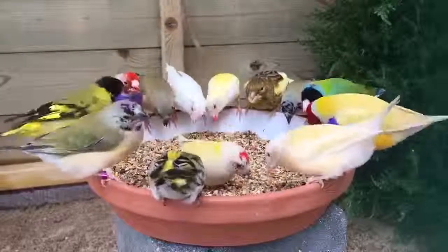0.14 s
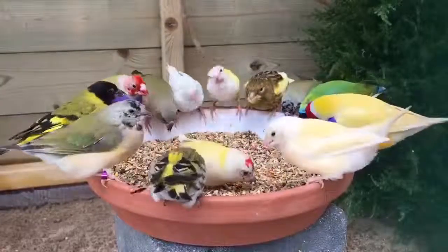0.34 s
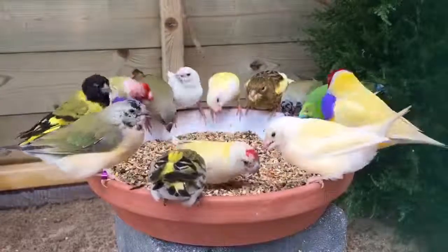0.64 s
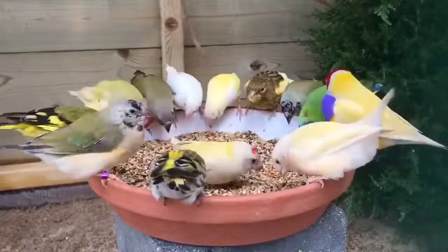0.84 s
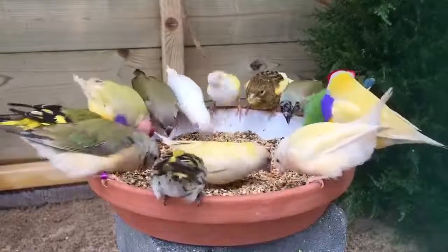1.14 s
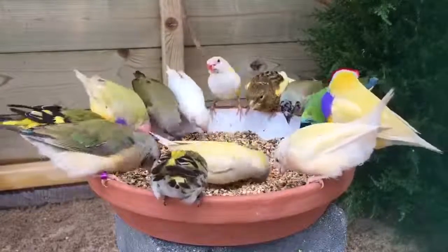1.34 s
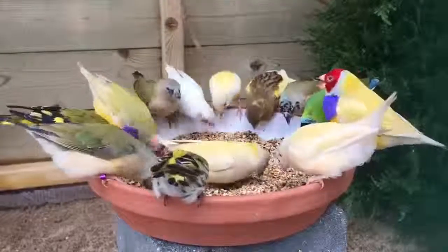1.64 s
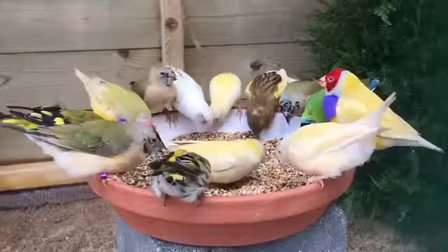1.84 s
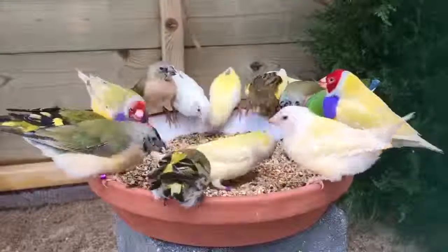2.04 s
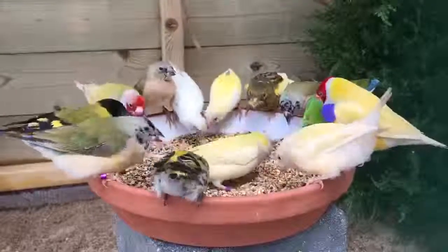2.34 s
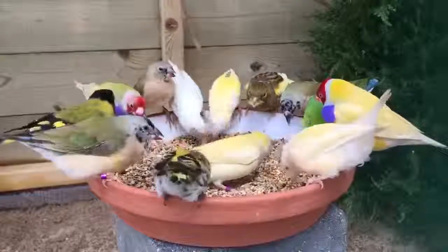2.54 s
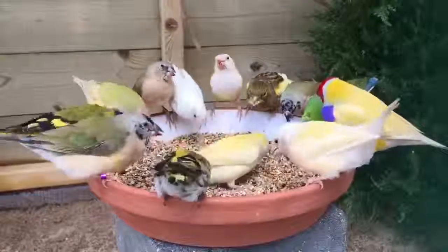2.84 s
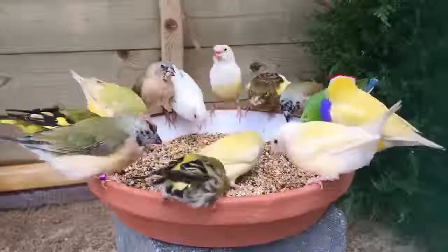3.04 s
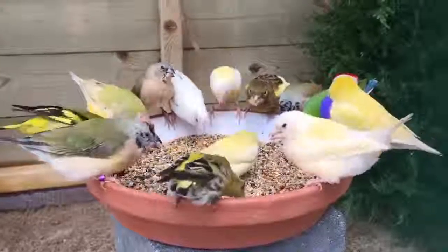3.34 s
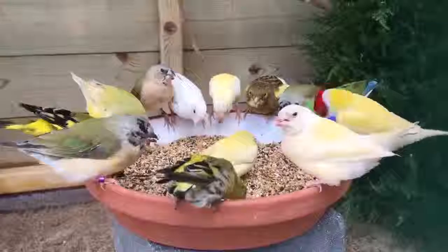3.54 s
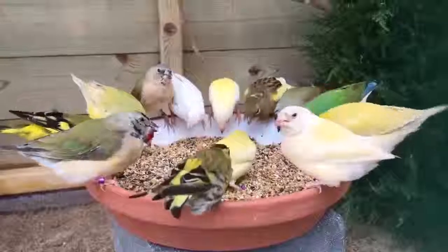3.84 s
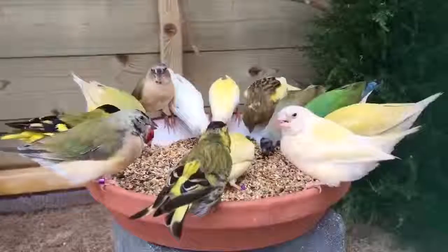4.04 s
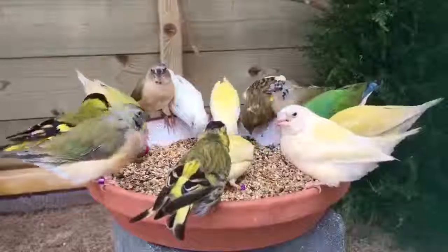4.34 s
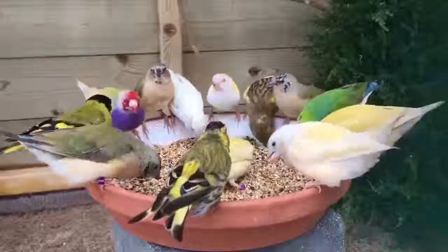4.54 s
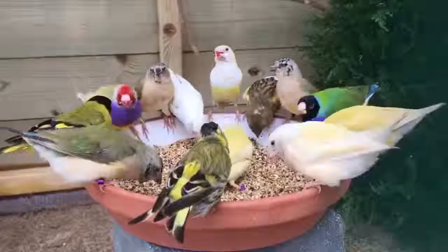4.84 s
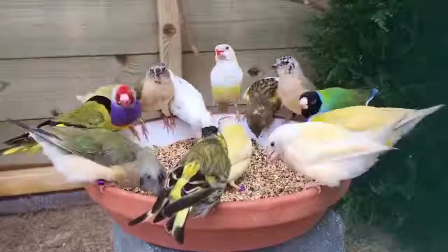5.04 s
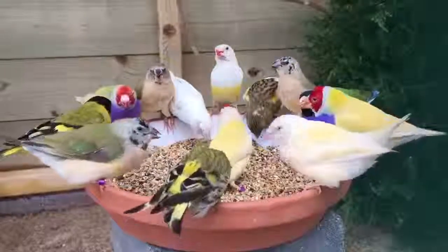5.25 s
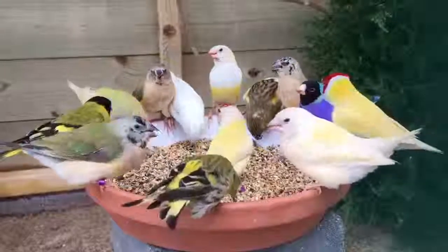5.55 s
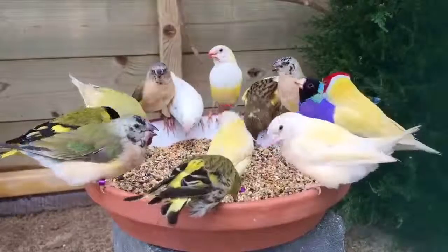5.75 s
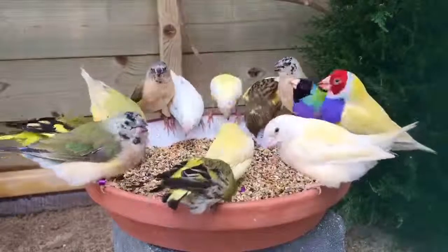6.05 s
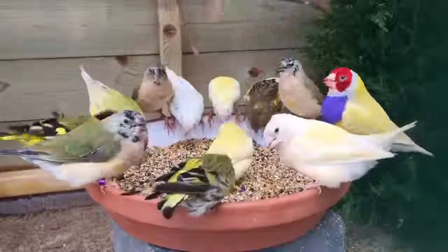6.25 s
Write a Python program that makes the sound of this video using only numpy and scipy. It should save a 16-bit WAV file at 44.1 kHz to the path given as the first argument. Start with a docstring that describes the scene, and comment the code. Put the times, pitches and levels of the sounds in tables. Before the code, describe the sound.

Finches crack seed at a clay dish with dry beak ticks and thin chirps, two loud wooden knocks, then distant squeaks over faint hiss.

```python
"""In a wooden aviary, finches husk seed at a clay dish close to the microphone.
Near sounds are bursts and grains of noise through resonances: beak ticks, scuffs, drags, rustling seed.
Thin chirps are arched whistles; two hard knocks and softer thuds ring wood modes and rattling boards.
Late on, farther off, something squeaks: high scraping of tone and noise, before and among squeaks with
clear partials around 1 kHz and lower. Hiss and an uneven low rumble, both shaped noise, lie under it all."""
import sys
import numpy as np
from scipy import signal
from scipy.fft import rfft, irfft
from scipy.io import wavfile
from scipy.ndimage import uniform_filter1d

SR = 44100
rng = np.random.default_rng(int(sys.argv[2]) if len(sys.argv) > 2 else 0)


def to_wav(sig):
    """Store sig (one row per channel, or 1-D mono) as 16-bit WAV at the path in sys.argv[1].

    Samples outside -1..1 are clipped; the rate is SR.
    """
    pcm = np.clip(np.atleast_2d(sig), -1, 1) * 32767
    pcm = np.round(pcm).astype(np.int16)
    wavfile.write(sys.argv[1], SR, pcm.T)  # frames by channels


def decibels_to_gain(level_db):
    """Convert a level in decibels to a linear amplitude gain (20 dB per decade)."""
    exponent = np.asarray(level_db, float) / 20
    return 10 ** exponent


N = 281799  # length in samples


def evened(x):
    """Scales to rms 1."""
    return x / np.sqrt(np.mean(x ** 2) + 1e-20)


def read(points, hz):
    """Reads a spectrum on a log frequency axis."""
    f, value = np.transpose(points)
    return np.interp(np.log(hz + 1), np.log(f + 1), value)


def add(mix, s, sound):
    """Mixes a sound in at time s."""
    part = mix[round(s * SR):][:len(sound)]
    part += sound[:len(part)]


def coloured(x, points):
    """Filters x by a spectrum in dB."""
    hz = np.fft.rfftfreq(len(x), 1 / SR)
    return irfft(rfft(x) * decibels_to_gain(read(points, hz)), len(x))


def resonate(x, hz, width):
    """Shifts the pitch or curve hz down to zero, smooths twice and shifts back: a steep resonance."""
    turn = np.exp(2j * np.pi * np.cumsum(hz * np.ones(len(x))) / SR)
    r = np.exp(-np.pi * width / SR)
    smooth = signal.lfilter([(1 - r) ** 2], [1, -2 * r, r * r], x / turn)
    return 2 * (turn * smooth).real


def wobble(n, size):
    """Slow chance of rms 1, smoothed twice over size samples."""
    return evened(uniform_filter1d(uniform_filter1d(rng.standard_normal(n), size), size))


def columns(rows):
    """Curve rows at sample rate: start, soft edges and a list of curves."""
    s, *rest = np.transpose(rows)
    t = np.arange(s[0], s[-1], 1 / SR)
    edge = np.clip(np.minimum(t - s[0], s[-1] - t) / 0.00087, 0, 1)
    return s[0], edge, [np.interp(t, s, c) for c in rest]


def hiss():
    """Steady background hiss; the level flickers in small random patches of time and frequency."""
    # Tone of the hiss. Each row: frequency in Hz, relative level in dB per Hz.
    hiss_tone = [(88, -20.5), (150, 4), (520, -10.5), (1050, -11), (2760, -15), (4000, -15.5),
                 (4950, -18.5), (7880, -19.5), (8860, -25), (14400, -46), (15600, -49)]
    hz, _, z = signal.stft(rng.standard_normal(N), SR, nperseg=1024)
    patches = uniform_filter1d(rng.standard_normal(z.shape), size=3, axis=0)
    patches = evened(uniform_filter1d(patches, size=2, axis=1))
    z = z * decibels_to_gain(read(hiss_tone, hz)[:, None] + 2.3 * patches)
    return decibels_to_gain(-69) * evened(signal.istft(z, SR, nperseg=1024)[1][:N])


def rumble():
    """Low noise in lumps: a resonance with a moving centre over a broad part."""
    # Course of the rumble. Each row: time in seconds, level in dB, centre in Hz.
    rumble_course = [(0.0, -65.5, 78), (1.12, -72.5, 71), (1.278, -65, 85.6), (2.81, -65.5, 117),
                     (3.02, -69, 70.5), (3.452, -59.5, 71), (3.9, -70, 102), (4.22, -70, 68),
                     (4.96, -62, 90.4), (5.44, -60.5, 86.4), (5.68, -64, 62.4), (6.39, -57, 49.5)]
    # Broad part under the moving centre. Each row: frequency in Hz, relative level in dB per Hz.
    broad_tone = [(20, -37), (45, -2.5), (130, -23), (450, -35.5), (1000, -62)]
    s, db, centre_hz = np.transpose(rumble_course)
    t = np.arange(N) / SR
    hum = evened(resonate(rng.standard_normal(N), np.interp(t, s, centre_hz), 34.5))
    broad = evened(coloured(rng.standard_normal(N), broad_tone))
    lumps = decibels_to_gain(np.interp(t, s, db) + 4.88 * wobble(N, size=1500))
    return lumps * (1.17 * hum + 0.46 * broad)


def rustle():
    """Dry seed shifts in the dish: tiny grains of noise in short swells over a faint stirring bed."""
    # Swells of the seed. Each row: centre in seconds, level in dB, length in seconds.
    swells = [(.0, -70, 0.048), (.1, -66, 0.048), (.42, -64.5, 0.066), (.49, -75, 0.12),
              (.58, -72.5, 0.051), (.87, -76, 0.045), (1.0, -66.5, 0.046), (1.09, -78.5, 0.22),
              (1.585, -60, 0.051), (2.1, -66, 0.072), (2.28, -73, 0.091), (2.37, -72.5, 0.056),
              (2.64, -80, .06), (2.88, -72.5, 0.056), (3.02, -77, 0.11), (3.715, -68, 0.028),
              (3.79, -86, 0.033), (4.5, -76, .05), (4.65, -80, 0.043), (4.97, -68, 0.13),
              (5.87, -64, 0.034), (6.145, -66.5, 0.046), (6.35, -65, 0.27)]
    # Tone of the seed. Each row: frequency in Hz, relative level in dB per Hz.
    seed_tone = [(5000, -6.5), (9000, -5), (11500, -1.5), (14500, 1.5), (15600, -6.5)]
    t = np.arange(N) / SR
    gain = decibels_to_gain(-82.5 + 3 * wobble(N, size=2000))  # the bed
    for s, db, length in swells:
        gain = gain + decibels_to_gain(db) * np.cos(np.pi * np.clip((t - s) / length, -.5, .5))
    grains = rng.standard_normal(N) * decibels_to_gain(1.9 * wobble(N, size=60))
    return gain * evened(coloured(grains, seed_tone))


def chirps():
    """Near-pure whistles with a slight flutter: pitch and level rise to one top, then both sink."""
    # Short calls of the finches. Each row: start in seconds, length in seconds, rms level at the top
    # in dB, top pitch in Hz, depth of the pitch arch in Hz.
    calls = [(0.084, 0.053, -63, 4450, 1090), (0.859, 0.043, -59, 4370, 1300),
             (1.258, 0.04, -59.5, 4364, 1310), (1.838, .045, -77, 4360, 600),
             (2.689, 0.068, -74, 4050, 800), (3.617, .045, -73, 5200, 200),
             (3.629, 0.031, -67.5, 4350, 300), (4.405, 0.059, -80, 4200, 400),
             (4.677, 0.031, -68.5, 4430, 503), (4.841, 0.014, -62.5, 5650, 300),
             (4.872, .07, -71, 3840, 298), (5.382, 0.048, -61, 4270, 396), (5.72, 0.072, -69.5, 4140, 705),
             (6.292, 0.11, -58.5, 4290, 405)]
    top_at = .36  # share of the call at which pitch and level top
    out = np.zeros(N)
    for s, length, db, top_hz, arch_hz in calls:
        u = np.arange(0, length, 1 / SR) / length - top_at
        hz = top_hz - arch_hz * u ** 2
        swell_db = -10 * (u / top_at) ** 2
        fade_db = -15 * (u / (1 - top_at)) ** 2
        shape_db = np.where(u < 0, swell_db, fade_db)
        pitch_flutter = wobble(SR // 4, size=80)[:len(u)]
        level_flutter = wobble(SR // 4, size=80)[:len(u)]
        turns = np.cumsum(hz * (1 + 0.0011 * pitch_flutter)) / SR
        whistle = decibels_to_gain(db + shape_db + 1.2 * level_flutter) * np.sin(2 * np.pi * turns)
        add(out, s, np.sqrt(2) * signal.windows.tukey(len(u), .15) * whistle)
    return out


def room(x, t60):
    """Sparse reflections of random sign off the wooden walls, dying by 60 dB in t60 seconds."""
    t = np.arange(SR // 3) / SR
    sparse = rng.choice([-1., 1.], len(t)) * (rng.random(len(t)) < .05)
    taps = sparse * decibels_to_gain(-60 * t / t60) * (t > .003)
    return signal.fftconvolve(x, taps / np.linalg.norm(taps))[:N]


def ticks():
    """Beak ticks: a sharp crack with a brief ring, in a short burst of noise that swells and dies around it."""
    # Beak ticks on seed. Each row: crack in seconds, level in dB, ring in Hz.
    tick_rows = [(0.0978, -41.5, 4360), (0.24, -42, 2820), (0.402, -51, 4000), (0.4244, -50.5, 4320),
                 (0.5752, -44, 2420), (0.906, -55, 4650), (1.002, -42, 3800), (1.023, -49.5, 2830),
                 (1.2987, -52, 5100), (1.582, -46.5, 5640), (2.145, -46.5, 3940), (2.2593, -51.5, 3670),
                 (2.3745, -57, 4300), (3.0037, -52, 3380), (3.3773, -54.5, 4200), (3.7108, -41, 6900),
                 (3.7123, -43.5, 2430), (3.7662, -45, 2530), (3.7828, -37, 3200), (3.7913, -46, 2200),
                 (3.8224, -43, 2650), (4.0614, -50.5, 5900), (4.235, -42.5, 3130), (4.577, -52.5, 4100),
                 (5.343, -50, 2760), (5.8648, -42.5, 4160), (6.0724, -44.5, 2270), (6.1367, -44.5, 3130)]
    out, t = np.zeros(N), np.arange(-440, 900) / SR
    before, after = np.minimum(t, 0), np.maximum(t, 0)
    for s, db, hz in tick_rows:
        crack = rng.standard_normal(len(t)) * (t >= 0) * decibels_to_gain(-60 * after / .003)
        burst = rng.standard_normal(len(t)) * decibels_to_gain(-20.5 - 60 * after / 0.11 + 60 * before / 0.044)
        ring = np.sin(2 * np.pi * hz * after) * decibels_to_gain(-60 * after / 0.015)
        body = 0.28 * ring + 1.62 * resonate(crack + burst, hz, 4750)
        top = decibels_to_gain(-33.0) * resonate(crack + burst, 12000, 5900)
        add(out, s + t[0], decibels_to_gain(db) * (body + top))
    return out


def scuffs():
    """Scuffs, and one soft low thud: clumped grains of noise through one resonance, narrow or broad."""
    # Scuffs of feet and seed, and the thud at 133 Hz. Each row: start in seconds, level in dB,
    # length in seconds (0.1 at most is heard), centre in Hz, width in Hz.
    scuff_rows = [(0.52, -72, 0.049, 7140, 2500), (0.574, -71, 0.055, 2220, 900),
                  (1.063, -66.5, 0.041, 6500, 2500), (2.08, -61, 0.049, 2180, 2580),
                  (3.793, -56.5, 0.03, 1240, 1760), (4.943, -60.5, 0.056, 5160, 6150),
                  (5.15, -69, 0.075, 5770, 3120), (5.189, -62, 0.045, 1340, 300),
                  (5.83, -70, 0.12, 5000, 5040), (5.271, -49.5, 0.057, 133.3, 46.7),
                  (5.579, -63.5, 0.055, 5150, 5850), (6.3, -55, 0.072, 1510, 2840)]
    out = np.zeros(N)
    for s, db, length, hz, width in scuff_rows:
        n = min(round(length * SR), 4410)
        grains = rng.standard_normal(n) * decibels_to_gain(1.2 * wobble(4410, size=50)[:n])
        scuff = evened(resonate(grains, hz, width))
        add(out, s, decibels_to_gain(db) * scuff * signal.windows.tukey(n, .6))
    return out


def drags():
    """A foot drags across the dish: clumped grains through its resonances, the low ones coming last."""
    # Drags. Each row: start at 3500 Hz in seconds, level in dB, length in seconds,
    # lag of the lower resonances in seconds per octave.
    drag_rows = [(1.07, -64, 0.081, 0.01), (5.262, -56, 0.071, 0.0014)]
    # Resonances of the clay dish. Each row: frequency in Hz, width in Hz, relative level in dB.
    dish_parts = [(850, 120, -9), (1154, 190, -0.5), (1655, 120, 0), (2420, 670, -2), (3480, 560, -6.5)]
    out = np.zeros(N)
    for s, db, length, lag in drag_rows:
        n = round(length * SR)
        swell = np.sin(np.pi * (np.arange(n) / n) ** 0.59)
        for hz, width, part_db in dish_parts:
            grains = rng.standard_normal(n) * decibels_to_gain(5.5 * wobble(4410, size=120)[:n])
            friction = evened(resonate(grains, hz, width))
            add(out, s + lag * np.log2(3500 / hz), decibels_to_gain(db + part_db) * friction * swell)
    return out


def knocks():
    """Each blow rings the wood modes, the low ones swelling slowly; boards rattle, the bass lasting longest."""
    # Blows on the woodwork. Each row: start in seconds, level in dB, hardness in dB (treble of the blow),
    # bass in dB, ringing time as a factor.
    blows = [(2.1146, -34.5, -16, 2, 0.14), (2.797, -48.5, -13.5, 3, 0.33), (3.155, -26, -10.5, -4, 0.91),
             (3.172, -27.5, -23, -5, 0.7), (3.308, -43.5, -19, 0.5, 1), (3.566, -59.5, -4, 33, 0.16),
             (3.805, -55, 1.5, 15, 0.49), (4.121, -24, -6.5, -4, 0.81), (4.14, -26.5, -20, 3, 0.32),
             (4.234, -41, -19, -22, 0.25), (4.284, -36.5, -26.5, 4, 0.75), (4.804, -64.5, -18, 21, 0.2),
             (4.91, -60.5, -8, 7.5, 1), (5.827, -38.5, -13, 5.5, 0.1), (6.304, -41, -7.5, 6.5, 0.43),
             (6.355, -42.5, -4.5, 5.5, 0.62)]
    # Modes of the wood. Each row: frequency in Hz, relative level in dB, t60 in seconds at factor 1.
    wood_modes = [(58.9, 8, 0.25), (72, 4.5, 0.25), (117, 4, 0.21), (176.3, -8, 0.48), (292, -20, 0.58),
                  (338, -8, 0.21), (358, -3.5, 0.15), (429, -11, 0.17), (693, -3.5, 0.079), (882, -4, 0.19),
                  (1199, -18.5, 0.15), (1254, -3, 0.16), (1675, -12.5, 0.12), (1820, -29, 0.32),
                  (2560, -19, 0.23)]
    # Loose boards rattling after a blow. Each row: frequency in Hz, relative level in dB per Hz.
    rattle_tone = [(29, -27), (50, 2.5), (107, 3), (204, -3.5), (346, -0.5), (570, -8), (919, -9.5),
                   (1790, -18), (1970, -12), (2690, -21.5), (6820, -33), (15000, -57.5)]
    # Decay of the rattle. Each row: frequency in Hz, t60 in seconds before factor and offset.
    rattle_t60 = [(100, 0.65), (260, 0.4), (700, 0.25), (1840, 0.26), (4850, 0.19)]
    out, t = np.zeros(N), np.arange(SR // 2) / SR
    for s, db, hard_db, bass_db, ringing in blows:
        ring = np.zeros(len(t))
        for f, mode_db, t60 in wood_modes:
            start_db = mode_db + hard_db * (f > 800) * 0.62 + bass_db * (f < 150)
            decay = decibels_to_gain(start_db - 60 * t / (t60 * ringing + 0.0026))
            swell = 1 - np.exp(-t / (1.2 / f + 0.0052))
            ring += decay * swell * np.sin(2 * np.pi * f * t + rng.uniform(-2.03, 1.98))
        hz, u, z = signal.stft(rng.standard_normal(len(t)), SR, nperseg=512)
        treble_db = (hard_db + 12.5) * np.clip(np.log2(hz / 500 + 1e-9), 0, 1)  # soft blows lack treble
        tone_db = read(rattle_tone, hz) + treble_db + bass_db * (hz < 150)
        die_s = read(rattle_t60, hz) * ringing + 0.035
        z = z * decibels_to_gain(tone_db[:, None] - 60 * u / die_s[:, None])
        rattle = signal.istft(z, SR, nperseg=512)[1][:len(t)]
        rattle = rattle * decibels_to_gain(2.1 * wobble(len(t), size=200) + 2.5 * np.exp(-t / 0.0037))  # dense front
        rattle = (1 - np.exp(-t / 0.0019)) * rattle
        push = np.sin(2 * np.pi * 450 * t) * decibels_to_gain(-60 * t / .012)  # the dull contact itself
        add(out, s, decibels_to_gain(db) * (0.55 * push + 0.65 * ring + decibels_to_gain(9.5) * rattle))
    return out


def scrapes():
    """Stick-slip rubbing that scrapes: a rasping line, its smeared octave and two rough resonances."""
    # One table a scraping squeak. Each row: time in seconds, pitch in Hz, level in dB,
    # then the levels of two upper resonances in dB.
    scrape_curves = [
        [(4.9, 4600, -79, -84, -77), (4.912, 4560, -62.5, -85, -76), (4.945, 4700, -66, -87, -62),
         (4.975, 4800, -78, -80, -68), (5.005, 4800, -71, -70, -76), (5.025, 4715, -64, -68, -69),
         (5.075, 4638, -57.5, -76, -78), (5.145, 4464, -61.5, -75, -73), (5.165, 4440, -54, -70, -84),
         (5.21, 4190, -56, -78, -91), (5.255, 4170, -83, -97, -94)],
        [(5.79, 4210, -71, -72, -73), (5.85, 4320, -65, -62, -75), (5.89, 4200, -92, -92, -84)],
    ]
    # Upper resonances. Each row: frequency in Hz, width in Hz, share of the pitch bend that it follows.
    upper_parts = [(5470, 260, .3), (6450, 420, 1)]
    out = np.zeros(N)
    for rows in scrape_curves:
        s, edge, (hz, db, *band_dbs) = columns(rows)
        n = len(hz)
        rasp = decibels_to_gain(3.5 * wobble(n, size=120))  # uneven slips
        turns = np.cumsum(hz * (1 + 0.0082 * wobble(n, size=40))) / SR
        tone = np.sqrt(2) * np.sin(2 * np.pi * turns)
        fuzz = evened(resonate(rng.standard_normal(n), hz, 600))
        octave = evened(resonate(rng.standard_normal(n), 2 * hz, 1100))
        upper = np.zeros(n)
        for band_db, (f, width, share) in zip(band_dbs, upper_parts):
            centre_hz = f + share * (hz - 4600)  # bend around a middle pitch of 4600 Hz
            upper += decibels_to_gain(band_db) * evened(resonate(rng.standard_normal(n), centre_hz, width))
        line = decibels_to_gain(db) * (tone + 0.22 * fuzz + decibels_to_gain(-15.5) * octave)
        add(out, s, edge * rasp * (line + upper))
    return out


def squeaks():
    """Stick-slip rubbing at a steady slip rate: clean partials, the overtones coming and going."""
    # One table a clear squeak. Each row: time in seconds, pitch in Hz, level in dB,
    # second partial in dB, higher partials in dB.
    squeak_curves = [
        [(5.397, 1094, -82, -100, -84), (5.409, 1078, -49.5, -74, -78), (5.429, 1035, -50.5, -67, -85),
         (5.507, 1022, -46.5, -65, -79.5), (5.553, 988, -36, -73, -79), (5.577, 961, -37, -70.5, -92),
         (5.585, 973, -33.5, -85, -75), (5.615, 930, -67, -74, -95)],
        [(5.797, 1042, -70, -91, -77), (5.811, 995, -42.5, -68, -89), (5.871, 1024, -41.5, -80, -71.5),
         (5.941, 1012, -39.5, -65, -102), (5.957, 1002, -43.5, -70, -73.5), (5.985, 1031, -43.5, -80, -74),
         (6.023, 993, -39, -68.5, -72.5), (6.053, 954, -82, -93, -80)],
        [(6.254, 834, -72, -91, -98), (6.26, 835, -49, -71, -102), (6.27, 808, -42.5, -82, -77),
         (6.274, 890, -53, -89, -103), (6.278, 782, -44, -79, -74), (6.286, 747, -48.5, -92, -92),
         (6.296, 720, -46.5, -76, -67), (6.305, 740, -74, -71, -81)],
    ]
    # Higher partials, as multiples of the pitch.
    multiples = (3, 4, 6, 7)
    # Level of each higher partial in dB, on top of the curve for all.
    multiples_db = (-5, 3.5, -7, -5)
    out = np.zeros(N)
    for rows in squeak_curves:
        s, edge, (hz, db, second_db, higher_db) = columns(rows)
        n = len(hz)
        turns = np.cumsum(hz * (1 + 0.0026 * wobble(n, size=200))) / SR
        first = decibels_to_gain(db + 0.13 * wobble(n, size=150)) * np.sin(2 * np.pi * turns)
        second = decibels_to_gain(second_db + 3.1 * wobble(n, size=300)) * np.sin(4 * np.pi * turns)
        higher = np.zeros(n)
        for k, part_db in zip(multiples, multiples_db):
            gain = decibels_to_gain(higher_db + part_db + 5.2 * wobble(n, size=250))
            higher += gain * np.sin(2 * np.pi * k * turns)
        add(out, s, np.sqrt(2) * edge * (first + second + higher))
    return out


def scene():
    """Ticks, scuffs, drags and chirps are drier than the far squeaks."""
    near = chirps() + ticks() + scuffs() + drags()
    far = scrapes() + squeaks()
    near_echo = decibels_to_gain(-13) * room(near, .1)
    far_echo = decibels_to_gain(-6.5) * room(far, 0.16)
    return (hiss() + rumble() + rustle() + near + near_echo + knocks() + far + far_echo)[None]


def roll_off(x):
    """The treble ends steeply here."""
    return signal.sosfilt(signal.butter(12, 15710, fs=SR, output="sos"), x)


def record(dry):
    """The microphone drops the deepest bass, below 37 Hz."""
    highpass = signal.butter(N=3, Wn=37, btype="high", fs=SR, output="sos")
    thinned = signal.sosfilt(highpass, dry)
    return roll_off(thinned)


dry = scene()
out = record(dry)
to_wav(out)
```